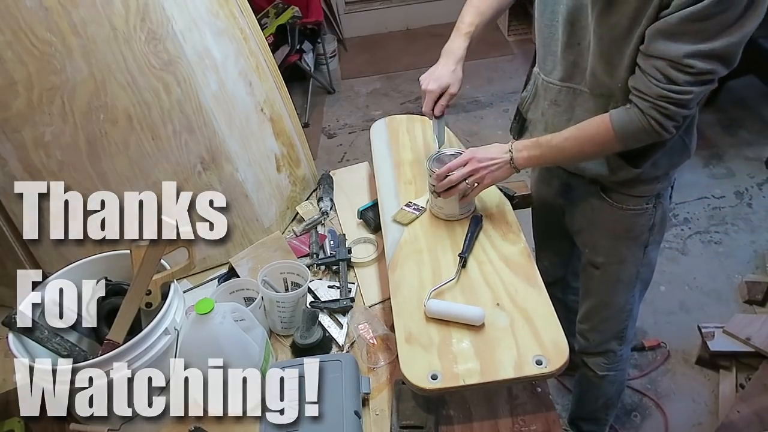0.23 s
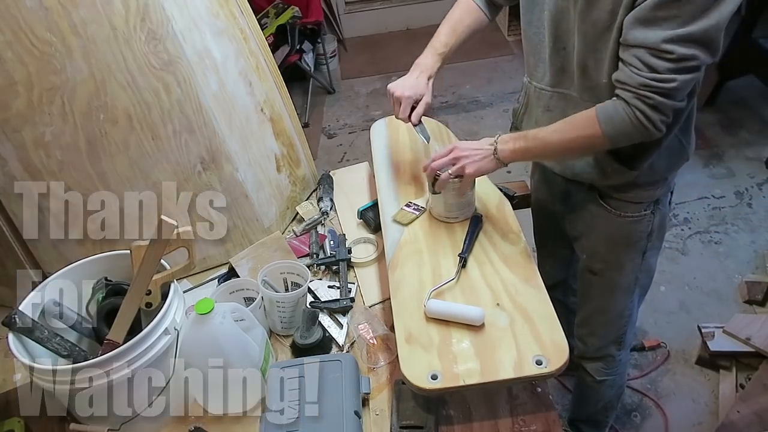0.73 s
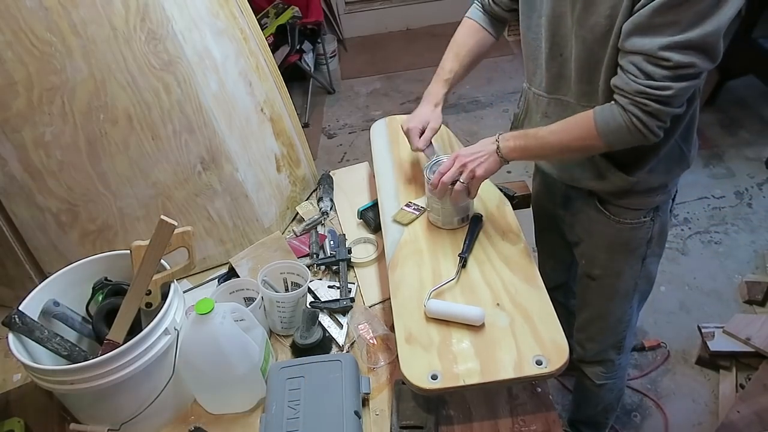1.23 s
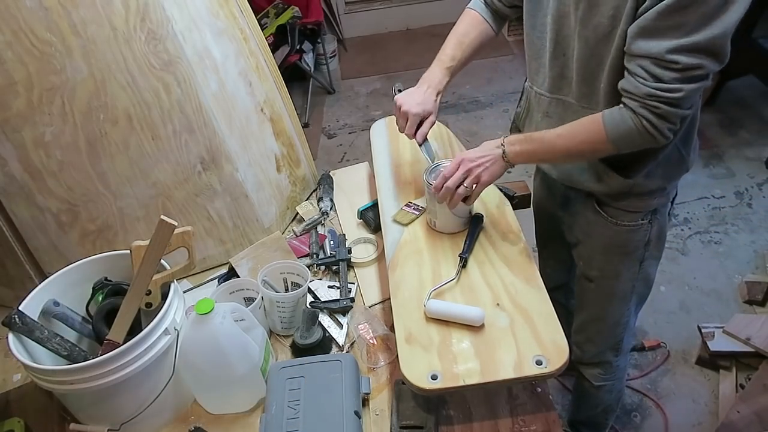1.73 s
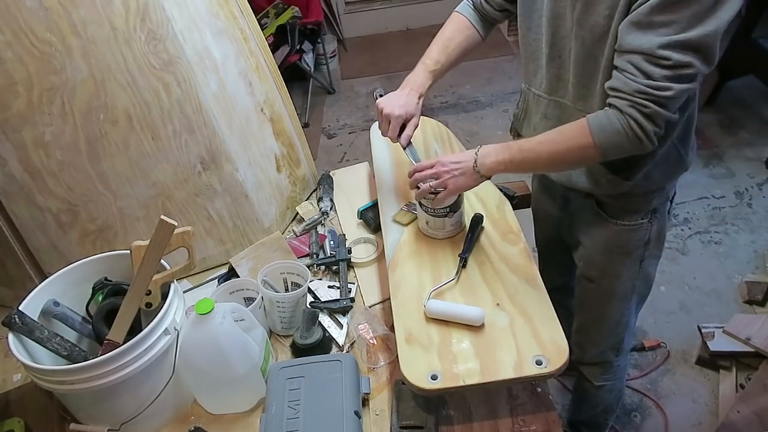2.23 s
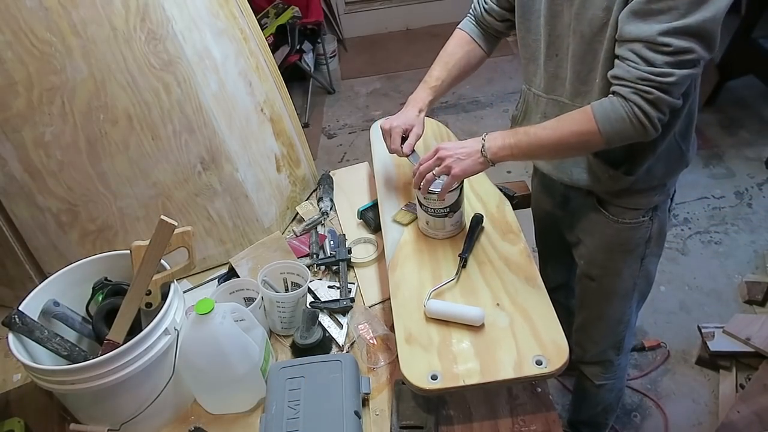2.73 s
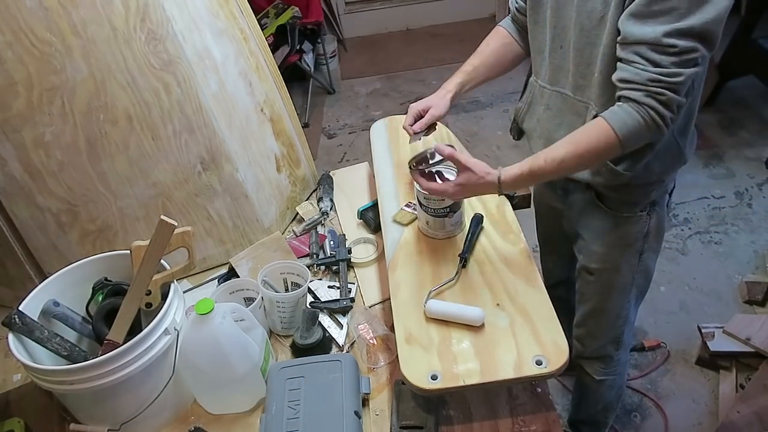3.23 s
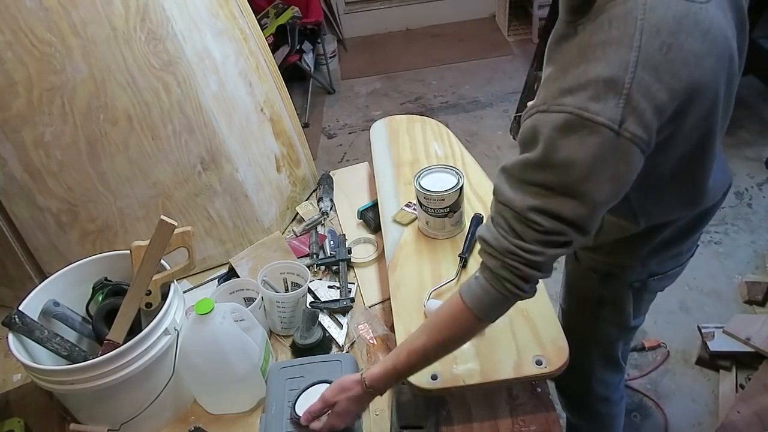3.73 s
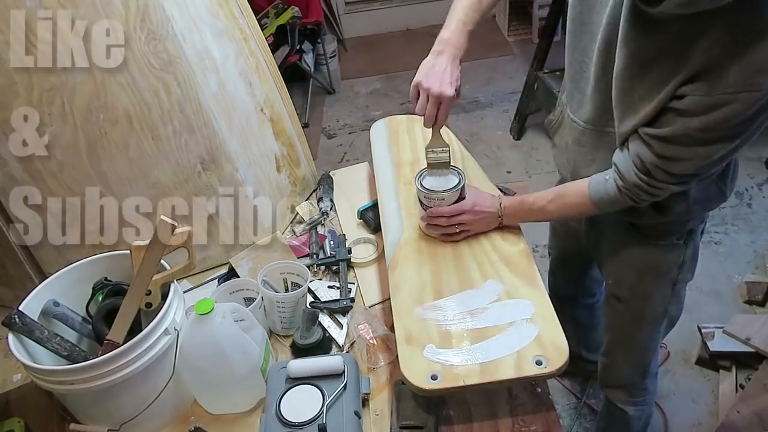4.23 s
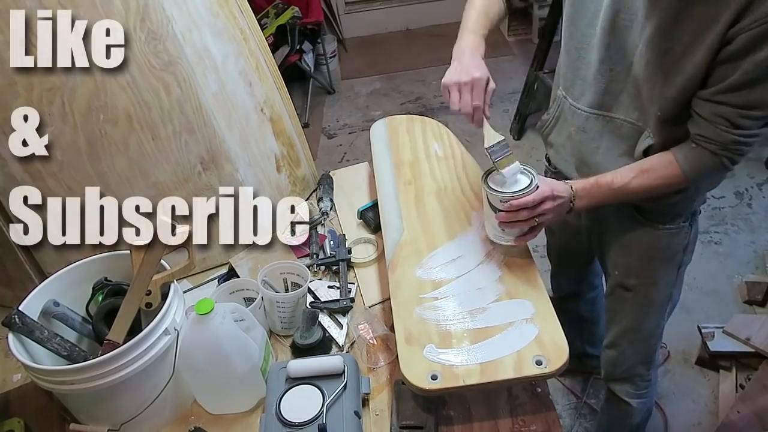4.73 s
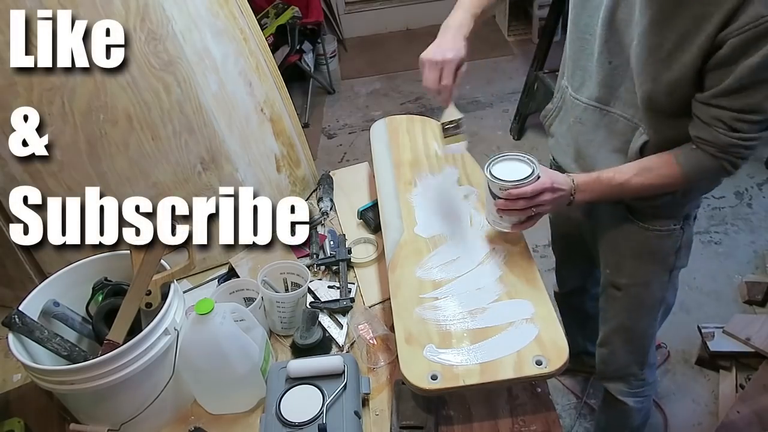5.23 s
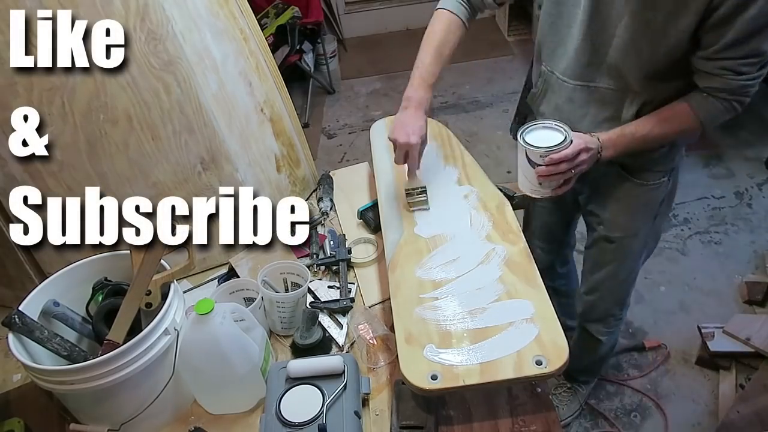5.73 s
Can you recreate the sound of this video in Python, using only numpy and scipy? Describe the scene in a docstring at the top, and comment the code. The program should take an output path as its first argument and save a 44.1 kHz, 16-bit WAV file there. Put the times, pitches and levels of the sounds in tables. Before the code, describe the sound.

In a home workshop with steady low hiss, a metal tool ticks, knocks and scrapes around a small paint tin on a plywood board. A hollow pop comes early as the seal gives. Prying continues, then goes quiet. The lid suddenly smacks a plastic case, very loud and close, bounces and rattles; its short room echo is cut off. Soft brush sweeps follow, close to the stereo microphone.

```python
"""A small tin of paint is pried open on a plywood board, then its lid drops sharp and loud on a plastic case and
a brush sweeps the board over the hiss of the workshop. Each touch of blade, tin, board and brush is a short
swell of noise, coloured by resonances or a smooth spectrum. The lid is a set of dying modes struck by clicks,
with a noise tail as room echo; the tail stops abruptly and the quieter sounds dip briefly after it.
The hiss is steady coloured noise."""
import sys
import numpy as np
from scipy import signal
from scipy.fft import rfft, irfft
from scipy.io import wavfile

SR = 44100
rng = np.random.default_rng(int(sys.argv[2]) if len(sys.argv) > 2 else 0)


def generate_wav(sig):
    """Save sig (samples, or channels by samples) to the path in sys.argv[1] as 16-bit PCM at SR."""
    pcm = np.round(np.clip(np.atleast_2d(sig).T, -1, 1) * 32767).astype(np.int16)
    wavfile.write(sys.argv[1], SR, pcm)


N = 263256
ECHO_END_S = 4.0848


def from_db(db):
    """Level: 20 dB is a factor of ten in amplitude."""
    return 10 ** (np.asarray(db) / 20)


def at_hz(points, hz):
    """Spectral curve: straight lines between points on a logarithmic frequency axis."""
    points_hz, values = np.transpose(points)
    return np.interp(np.log(hz + 1), np.log(points_hz), values)


def resonances(modes, favoured_hz, clear_db, focus_db, valley_db, tilt_db, line_hz, top_hz):
    """Modal excitation: focus_db per octave weakens modes far from the favoured pitch (negative values
    strengthen them); a clear touch adds a narrow line at that pitch and empties the valleys between the modes."""
    mode_hz, width_hz, mode_db = np.transpose(modes)
    octaves_away = np.abs(np.log2(mode_hz / favoured_hz))
    mode_db = mode_db - focus_db * octaves_away + 2.0 * rng.standard_normal(len(mode_hz))
    strongest_db = mode_db.max()

    def gain(f):
        peaks = from_db(2 * mode_db) / (1 + (2 * (f[:, None] - mode_hz) / width_hz) ** 2)
        line_shape = 1 / (1 + (2 * (f - favoured_hz) / line_hz) ** 2) ** 2
        line = from_db(2 * (strongest_db + clear_db)) * line_shape
        slope_db = tilt_db * np.log2((f + 1) / mode_hz[0])   # tilt_db per octave
        valley = from_db(2 * (strongest_db + valley_db - clear_db + slope_db))
        inside = 1 / (1 + (mode_hz[0] * .8 / (f + 1)) ** 12 + (f / top_hz) ** 8)
        return np.sqrt((peaks.sum(1) + line + valley) * inside)
    return gain


def stereo_noise(size, gain, likeness):
    """Interchannel correlation: shared and opposed noise mix by the likeness at each frequency."""
    f = np.arange(size // 2 + 1) * SR / size
    mid, side = rfft(rng.standard_normal((2, size))) * gain(f)
    alike = np.clip(at_hz(likeness, f), -.99, .99)
    shared = np.sqrt(1 + alike) * mid
    opposed = np.sqrt(1 - alike) * side * [[1], [-1]]
    return irfft(shared + opposed, size)


def add_swell(out, peak_s, rise_s, fall_s, level_db, gain):
    """Amplitude envelope: coloured noise swells and sinks, round on top, about 6 dB down at rise_s and fall_s."""
    # left-right correlation of nearby touches: frequency_hz, likeness (-1 to 1)
    near_likeness = [(60, 1), (180, 1), (550, 0.97), (1650, 1), (4970, 0.97), (15000, 0.33)]
    grit_db, grain_s = 2, .004   # random level changes roughen every swell
    span = np.arange(-8192, 8192)
    t = span / SR
    u = t / np.where(t < 0, rise_s, fall_s)
    swell = from_db(-7.0 * ((u ** 2 + 0.097) ** 0.61 - 0.28 ** 0.76))
    grit = np.interp((t - t[0]) / grain_s, np.arange(400), rng.standard_normal(400))
    puff = swell * from_db(grit_db * grit) * stereo_noise(len(t), gain, near_likeness)
    # the mono sum carries the energy of the smooth swell
    puff *= from_db(level_db) * np.sqrt(np.sum(swell ** 2) / np.sum(puff.mean(0) ** 2))
    at = round(peak_s * SR) + span
    keep = (at >= 0) & (at < N)
    out[:, at[keep]] += puff[:, keep]


def metal_contacts(out):
    """Impact excitation: a metal touch rings rim modes with a high tick; a dull touch is a slip and lasts longer."""
    # metal touches, mostly blade on rim; the last one comes during the brushing:
    # peak_s, level_db, pitch_hz, clearness_db, tick_db (relative to the ring)
    contacts = [(0.188, -47.5, 2120, 11, -14.5), (0.419, -43.5, 2070, 7.5, -12),
                (0.995, -44, 2216, 10, -18), (1.172, -50, 3600, 1, -18), (1.304, -40.5, 2073, 2.5, -10),
                (1.495, -45, 1940, -2.5, -32), (1.571, -43.5, 2040, 7, -15.5),
                (1.775, -48, 1640, -2.5, -27), (1.871, -40, 3755, 3, -8.5), (1.965, -52.5, 2004, 4, -23),
                (2.043, -43.5, 3770, 1.5, -16), (2.146, -54, 3720, 3.5, -10.5),
                (2.227, -57.5, 2590, 6, -10.5), (2.296, -53.5, 3700, 4.5, -11.5),
                (2.367, -49.5, 3430, 0.5, -15.5), (2.432, -46.5, 3520, 1.5, -13),
                (2.486, -43, 2534, 9, -5.5), (5.91, -46, 1640, -2, -14)]
    # rim resonances: frequency_hz, width_hz, level_db
    rim_modes = [(1686, 25, 3), (2010, 116, 1), (2164, 96, 1), (2535, 9.2, -6), (2820, 340, -9),
                 (3460, 52, 0), (3580, 97, -9.5), (3860, 120, 3)]
    # tick resonances: frequency_hz, width_hz, level_db
    tick_modes = [(4505, 160, 5.5), (5060, 600, -6.5), (5900, 410, -3), (6610, 130, -6), (8700, 130, -10),
                  (11240, 170, -6), (12300, 300, -13), (13900, 400, -20)]
    slip_stretch_per_db = 0.1755   # for clearness below zero
    for peak_s, level_db, pitch_hz, clear_db, tick_db in contacts:
        stretch = 1 + slip_stretch_per_db * max(-clear_db, 0)
        rim = resonances(rim_modes, pitch_hz, clear_db, focus_db=10.0, valley_db=-9.0, tilt_db=-8.5,
                         line_hz=60, top_hz=3800)
        tick_hz = rng.uniform(5390, 6610)   # each tick favours its own pitch
        tick = resonances(tick_modes, tick_hz, 0, focus_db=0.5, valley_db=-12, tilt_db=-9.5,
                          line_hz=250, top_hz=15000)
        add_swell(out, peak_s, stretch * .011, stretch * 0.014, level_db, rim)
        add_swell(out, peak_s, stretch * .013, stretch * .013, level_db + tick_db, tick)


def board_resonance(pitch_hz):
    """Low-frequency resonance: the plywood board answers a push in a few broad modes."""
    # board resonances: frequency_hz, width_hz, level_db
    board_modes = [(128.5, 26, -0.5), (195, 34, -9.5), (298.8, 9.3, -4), (309.6, 20, -11.5)]
    return resonances(board_modes, pitch_hz, 6.3, focus_db=-2.0, valley_db=-25, tilt_db=13,
                      line_hz=26.74, top_hz=306)


def shove_board(out, peak_s, level_db):
    """Forced response: a push on the tin swells in the board resonances."""
    add_swell(out, peak_s, 0.015, 0.0196, level_db, board_resonance(299.2))


def tin_knocks(out):
    """Coupled vibration: the tin, knocked or flexed, rings and shoves the board a little later."""
    # touches of the tin: peak_s, half_length_s, level_db, pitch_hz, clearness_db, board_db (relative to the tin)
    knocks = [(0.19, .016, -50.5, 783, 4.5, -6.5), (0.421, .009, -39, 847, 4, -15),
              (0.465, 0.022, -48.5, 467, -9, -1.5), (0.53, 0.025, -55, 480, 1, -4),
              (0.576, 0.013, -63, 460, -1, 5), (0.757, .011, -47.5, 571, 22.5, -10.5),
              (1.001, 0.027, -43.5, 866, -1, -11), (1.186, 0.023, -53.5, 1030, -1, -8),
              (1.321, .016, -38, 1014, -7, -5.5), (1.495, 0.031, -47, 755, -4, -2.5),
              (1.597, 0.021, -45, 447, 1, -2), (1.775, 0.024, -53, 1045, 8, -12),
              (1.881, 0.014, -39.5, 856, 0, -4.5), (1.964, .01, -53, 1010, 4, 6),
              (2.053, 0.022, -50, 836, 14, -9), (2.087, .01, -48.5, 1070, 3, -0.5),
              (2.139, 0.011, -48.5, 763, 6, -10), (2.177, 0.013, -48.5, 500, -14, -6),
              (2.225, 0.011, -50, 810, 9, -2), (2.285, 0.024, -51.5, 1083, 12, 0),
              (2.372, 0.018, -48.5, 740, -5, -6), (2.435, 0.011, -38, 887, 7.5, -10),
              (2.487, .013, -40.5, 760, -2, -5.5), (2.594, 0.034, -61, 972, 15, -3),
              (2.649, .025, -66, 1330, 14, -10), (3.04, 0.016, -64, 1183, 25, -8),
              (3.066, 0.024, -63, 1124, 13, 4), (3.658, 0.015, -53.5, 530, -20, -3),
              (4.246, 0.014, -59.5, 1145, 9, 1), (5.912, 0.016, -53.5, 1420, 10, -10)]
    # tin body resonances: frequency_hz, width_hz, level_db
    body_modes = [(460, 54, 2.5), (487, 18, 2), (636, 120, -11), (742, 40, 3.5), (871, 11, 3),
                  (1066, 74, 0.5), (1176, 16, -17), (1293, 13, -4.5), (1306, 76, -47)]
    board_lag_s = .006
    for peak_s, half_s, level_db, pitch_hz, clear_db, board_db in knocks:
        body = resonances(body_modes, pitch_hz, clear_db, focus_db=1.5, valley_db=-20.0, tilt_db=-3.0,
                          line_hz=40, top_hz=1220)
        add_swell(out, peak_s, half_s, half_s, level_db, body)
        shove_board(out, peak_s + board_lag_s, level_db + board_db)


def board_thumps(out):
    """Mass on springs: the board bounces on its supports under the leaning hands, a low thump."""
    # thumps: peak_s, level_db
    thumps = [(0.155, -60), (0.683, -52.5), (0.895, -41.5), (0.975, -41), (1.085, -49.5), (1.226, -53.5),
              (1.437, -47), (1.52, -52), (1.58, -49.5), (1.703, -51), (1.819, -51), (2.06, -60),
              (2.16, -52.5), (2.49, -47.5), (2.981, -58.5), (3.06, -62), (4.14, -57.5), (4.24, -53),
              (4.408, -59.5)]
    for peak_s, level_db in thumps:
        add_swell(out, peak_s, 0.027, 0.033, level_db, board_resonance(126.7))


def blade_scrapes(out):
    """Friction noise: the blade drags along the groove with a broad, smooth spectrum."""
    # scrapes: peak_s, half_length_s, level_db
    scrapes = [(0.522, 0.022, -63.5), (0.601, 0.063, -61), (0.859, 0.036, -49.5), (1.029, .033, -60),
               (1.175, 0.015, -53), (1.217, 0.021, -50), (1.355, 0.017, -57), (1.454, 0.028, -53),
               (1.594, 0.017, -56.5), (1.741, 0.021, -50.5), (1.896, 0.016, -58), (2.076, 0.028, -50),
               (2.327, 0.062, -51.5), (2.538, 0.05, -65)]
    # drag spectrum before brightening: frequency_hz, density_db (per Hz)
    drag = [(350, -26), (600, -2), (760, -3), (1010, -8.5), (2020, -6), (4600, -25), (6500, -43),
            (12000, -57)]
    bright_db = 2.5   # per octave

    def drag_gain(f):
        return from_db(at_hz(drag, f) + bright_db * np.log2(f / 2000 + .01))
    for peak_s, half_s, level_db in scrapes:
        add_swell(out, peak_s, half_s, half_s, level_db, drag_gain)


def seal_pop(out):
    """Sudden release: the seal gives way, tin and lid ring together and the board is shoved."""
    # the pop: peak_s, rise_s, fall_s, level_db
    pop = [(.909, 0.013, 0.014, -21.5)]
    # tin and lid together: frequency_hz, width_hz, level_db
    seal_modes = [(498, 30, 5), (830, 43, -1.5), (1064, 56, -1), (1250, 44, 2.5), (1440, 23, -0.5),
                  (1670, 24, -2), (2050, 110, -2.5), (2480, 27, -30), (2740, 40, -9), (2880, 42, -12),
                  (3700, 29, -30), (4100, 40, -37)]
    peak_s, rise_s, fall_s, level_db = pop[0]
    seal = resonances(seal_modes, 866, -2.5, focus_db=-0.7, valley_db=-14.5, tilt_db=-6.5,
                      line_hz=40, top_hz=4000)
    add_swell(out, peak_s, rise_s, fall_s, level_db, seal)
    shove_board(out, peak_s, level_db - 19.5)


def loose_lid_ting(out):
    """Free vibration: the loose lid, touched, rings in narrow modes."""
    # the touch: peak_s, rise_s, fall_s, level_db
    ting = [(3.043, .01, .014, -59.5)]
    # loose lid resonances: frequency_hz, width_hz, level_db
    loose_lid_modes = [(2490, 40, -1), (3280, 40, -1), (4170, 45, 3), (4950, 60, -4)]
    lid = resonances(loose_lid_modes, 2480, 0, focus_db=.1, valley_db=-33, tilt_db=-1,
                     line_hz=30, top_hz=6000)
    add_swell(out, *ting[0], lid)


def handling():
    """Superposition: the touches of blade, tin, lid and board add up."""
    out = np.zeros((2, N))
    metal_contacts(out)
    tin_knocks(out)
    board_thumps(out)
    blade_scrapes(out)
    seal_pop(out)
    loose_lid_ting(out)
    return out


def ring(clicks, modes):
    """Modal synthesis: clicks set every mode ringing as a dying sine; neighbours start in opposite directions."""
    out = 0
    for k, (hz, level_db, t60_s) in enumerate(modes):
        decay = from_db(-60 / (t60_s * SR))   # per sample
        w = 2 * np.pi * hz / SR
        numerator = [0, from_db(level_db) * np.sin(w)]
        denominator = [1, -2 * decay * np.cos(w), decay * decay]
        out = out + (-1) ** k * signal.lfilter(numerator, denominator, clicks + 1e-18)
    return out


def workshop(clicks):
    """Reverberation: clatter and echo as half-octave bands of noise, each dying at its own rate."""
    # colour of the clatter in the room: frequency_hz, density_db (per Hz)
    echo_colour = [(70, -31.5), (110, -14), (170, 1), (270, -2.5), (480, -11), (590, -6.5), (660, -8),
                   (1270, -10), (2520, -13), (3800, -16.5), (6700, -27), (10000, -40), (13000, -51.5),
                   (16000, -79.5)]
    # left-right correlation of the echo: frequency_hz, likeness (-1 to 1)
    echo_likeness = [(60, 0.98), (180, 1), (550, 0.61), (1650, 0.72), (4970, 0.29), (15000, 0.2)]
    # reverberation time: frequency_hz, t60_s
    echo_t60 = [(100, 0.55), (300, 0.2), (1800, .4), (5000, .3), (12800, .2)]
    t = np.arange(SR // 2) / SR
    response = 0
    for hz in 100 * 2 ** np.arange(0, 7.5, .5):
        def band(f):
            return from_db(at_hz(echo_colour, f)) * np.exp(-(np.log2((f + 1) / hz) * 3) ** 2)
        decay = from_db(-60 * t / at_hz(echo_t60, hz))
        response = response + decay * stereo_noise(len(t), band, echo_likeness)
    response = response * np.clip(t / 0.012, 0, 1)   # the first walls answer after a few ms
    response = from_db(7.5) * response / np.sqrt(np.sum(response ** 2) / 2)
    return signal.fftconvolve(clicks[None], response, axes=1)[:, :len(clicks)]


def lid_drop():
    """Repeated impact: the lid lands, bounces and rattles on the case; its echo stops abruptly."""
    # landings: start_s, level_db, then added to that level: thud_db, ring_db, crack_db, echo_db, rattle_db
    landings = [(3.833, 1, -3.5, 0, 2.5, -0.5, -22), (3.9341, -0.5, -3.5, 2.5, -18.5, 1, -14.5),
                (3.975, -11.5, -7.5, 2, -19, 3.5, -22), (3.987, -28.5, -15, 9, -39, 7, -10),
                (4.007, -22.5, 5.5, -11, -25, 10, -18)]
    # modes of the case: frequency_hz, level_db, t60_s
    case_modes = [(177.7, -13, 0.16), (246.2, -18.5, 0.063), (435, -22, 0.053), (633, -22.5, 0.062),
                  (926, -22.5, 0.044)]
    # modes of the slap: frequency_hz, level_db, t60_s
    slap_modes = [(1337, -4, 0.024), (1570, -7.5, 0.034), (2130, -8.5, 0.018), (2690, -6.5, 0.015),
                  (3700, -25, 0.039), (4400, -24, 0.017)]
    # modes of the lid: frequency_hz, level_db, t60_s
    lid_modes = [(1206, -32, 0.2), (1547, -32.5, 0.15), (2051, -33.5, 0.25), (2272, -28.5, .12),
                 (2486, -27, 0.25), (2830, -33, 0.12), (3094, -29, 0.2), (3220, -16, 0.097),
                 (3620, -38, .1), (4050, -33.5, 0.23), (4540, -37, 0.09), (4910, -41, 0.15),
                 (5160, -40.5, 0.1), (5830, -44, 0.13), (6820, -44, .2), (7150, -46, .08)]
    # modes of the crack: frequency_hz, level_db, t60_s
    crack_modes = [(2330, -4.5, .005), (6748, -9.5, 0.0029), (11050, -24.5, .003)]
    rattle_per_s, rattle_t60_s, contact_hz = 330, 0.15, 6100
    start, end = round(3.8 * SR), round(ECHO_END_S * SR)
    start_s, level_db, thud_db, ring_db, crack_db, echo_db, rattle_db = np.transpose(landings)

    def blows(extra_db):
        clicks = np.zeros(end - start)
        clicks[np.round(start_s * SR).astype(int) - start] = from_db(level_db + extra_db)
        return clicks
    # after each landing the rim chatters on the case: random small touches that die away
    shaking = signal.lfilter([1], [1, -from_db(-60 / (rattle_t60_s * SR))], blows(rattle_db))
    strength = rng.standard_normal(end - start)
    touching = rng.random(end - start) < rattle_per_s / SR
    chatter = shaking * strength * touching
    slap = ring(blows(0), slap_modes)
    thud = ring(blows(thud_db), case_modes)
    lid_ring = ring(blows(ring_db) + chatter, lid_modes)
    finite_contact = signal.butter(2, contact_hz, fs=SR, output="sos")   # a contact of finite length
    direct = signal.sosfilt(finite_contact, slap + thud + lid_ring) + ring(blows(crack_db), crack_modes)
    no_deep_bass = signal.butter(4, 125, "high", fs=SR, output="sos")   # small things push no deep bass
    direct = signal.sosfilt(no_deep_bass, direct)
    out = np.zeros((2, N))
    out[:, start:end] = direct * from_db([[.2], [-.2]]) + workshop(blows(echo_db))
    return out


def brushing():
    """Friction noise: soft sweeps of hiss, brighter from the bristle tips, and two faint taps of brush on tin."""
    # sleeve and brush sweeps: peak_s, level_db, bristle_db (relative to the sweep)
    strokes = [(2.75, -71, -15), (2.875, -65.5, -27), (2.934, -64, -27), (3.112, -66.5, -23),
               (3.463, -62, -21), (3.559, -69, -14), (3.649, -66, -26.5), (4.229, -58.5, -24),
               (4.274, -70.5, -5.5), (4.306, -59, -23), (4.417, -63, -21), (4.5, -66, -25),
               (4.616, -63, -24), (4.701, -62, -13), (4.912, -70.5, -22), (5.093, -62, -20),
               (5.158, -66.5, -11), (5.197, -60.5, -22), (5.282, -65, -10.5), (5.531, -70.5, -16),
               (5.646, -60, -23), (5.7, -62.5, -17)]
    # sweep spectrum: frequency_hz, density_db (per Hz)
    brush = [(530, -35.5), (900, 0.5), (1750, 4.5), (2330, 4.5), (4030, 1), (6000, -8.5), (7800, -47),
             (13200, -120)]
    # bristle tip spectrum: frequency_hz, density_db (per Hz)
    bristle = [(4000, -22), (6000, -0.5), (12000, -5), (12800, -28)]
    # brush touches tin: peak_s, rise_s, fall_s, level_db, pitch_hz
    taps = [(4.505, .015, 0.02, -73.5, 3020), (5.522, .012, 0.011, -71, 4990)]
    half_s = 0.027
    out = np.zeros((2, N))
    for peak_s, level_db, bristle_db in strokes:
        add_swell(out, peak_s, half_s, half_s, level_db, lambda f: from_db(at_hz(brush, f)))
        add_swell(out, peak_s, half_s, half_s, level_db + bristle_db, lambda f: from_db(at_hz(bristle, f)))
    for peak_s, rise_s, fall_s, level_db, pitch_hz in taps:
        add_swell(out, peak_s, rise_s, fall_s, level_db, lambda f: 1 / (1 + ((f - pitch_hz) / 150) ** 2))
    return out


def room_hiss():
    """Stationary noise: steady air and microphone noise, with a thin band far up."""
    # hiss spectrum: frequency_hz, density_db (per Hz)
    hiss = [(15, -30), (25, -3), (80, 0), (154, -3), (266, 1), (483, -3), (626, -8), (751, -7), (1440, -13),
            (2120, -16.5), (3760, -21), (10300, -34), (12400, -39), (16100, -69.5), (22000, -120)]
    # left-right correlation of the hiss: frequency_hz, likeness (-1 to 1)
    far_likeness = [(25, 1), (60, 0.91), (130, 0.16), (290, -0.41), (640, -0.056), (1410, -0.26),
                    (3100, 0.43), (6820, 0.011), (15000, -0.33)]
    hiss_db, thin_db, thin_hz, thin_width_hz = -60.5, -90, 13500, 420
    broad = stereo_noise(N, lambda f: from_db(at_hz(hiss, f)), far_likeness)
    thin = stereo_noise(N, lambda f: 1 / (1 + (2 * (f - thin_hz) / thin_width_hz) ** 6), far_likeness)
    broad = from_db(hiss_db) * broad / np.std(broad.mean(0))
    thin = from_db(thin_db) * thin / np.std(thin.mean(0))
    return broad + thin


def scene():
    """Superposition: all sources add; all but the lid drop dip briefly as its echo stops."""
    # brief dip of the quieter sounds: time_s, level_db
    dip = [(4.083, 0), (4.095, -9), (4.106, -24), (4.125, -9), (4.142, 0)]
    dip_gain = from_db(np.interp(np.arange(N) / SR, *np.transpose(dip)))
    touches = from_db([[-0.05], [0.05]]) * (handling() + brushing())   # a trace weaker on the left
    return dip_gain * (touches + room_hiss()) + lid_drop()


def record(dry):
    """Clipping and band limit: the loudest peaks are cut flat, then the treble above 16.4 kHz is removed."""
    clipped = np.clip(dry, -.95, .95)
    return signal.sosfilt(signal.cheby2(12, 60, 16400, fs=SR, output="sos"), clipped)


dry = scene()
out = record(dry)
generate_wav(out)
```